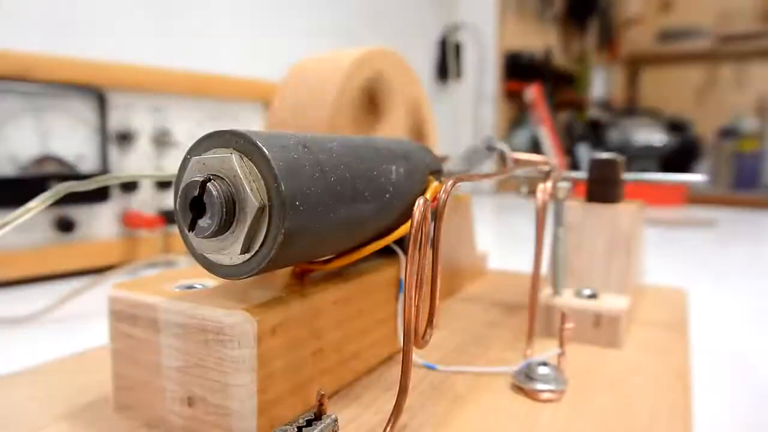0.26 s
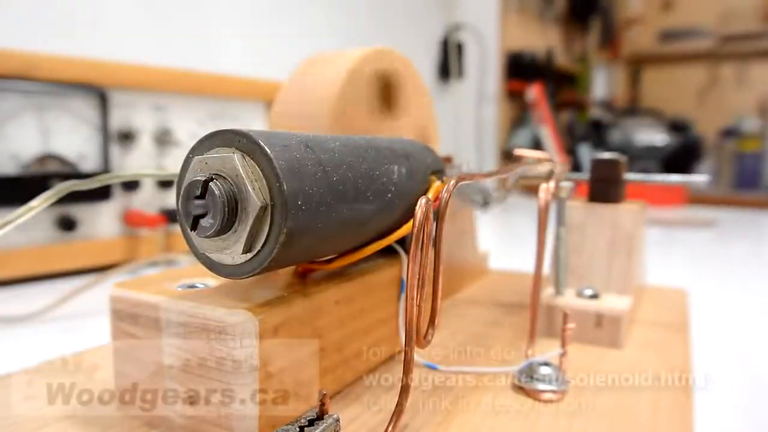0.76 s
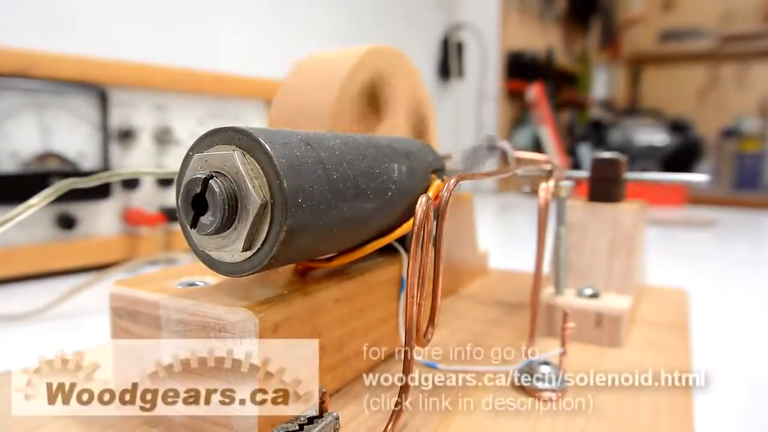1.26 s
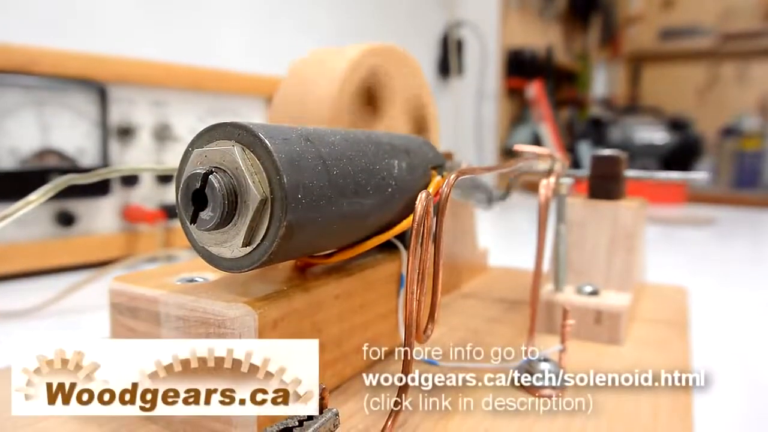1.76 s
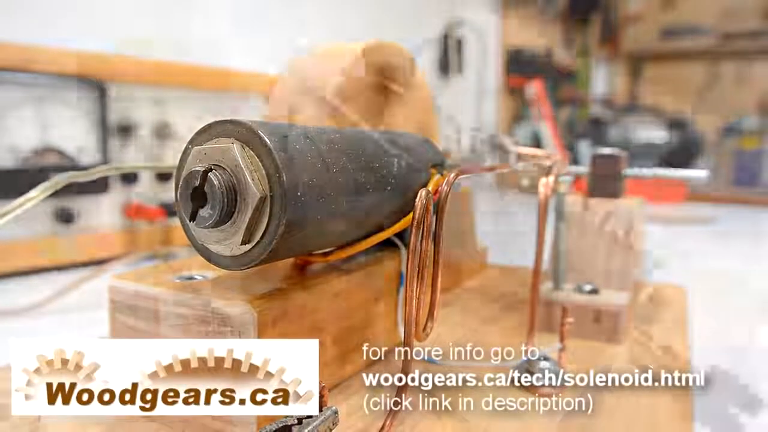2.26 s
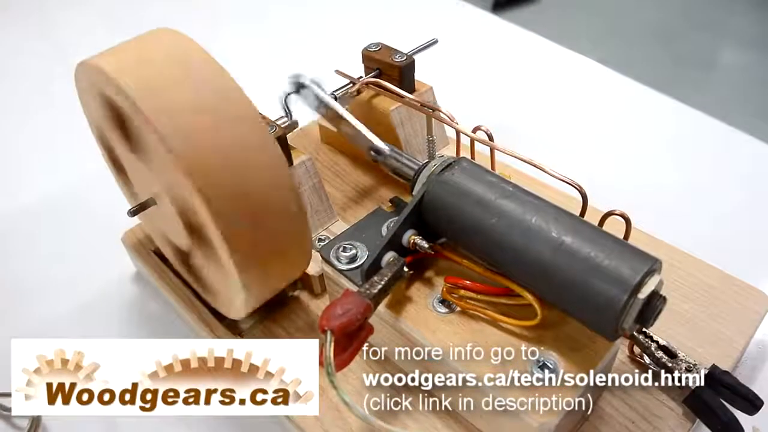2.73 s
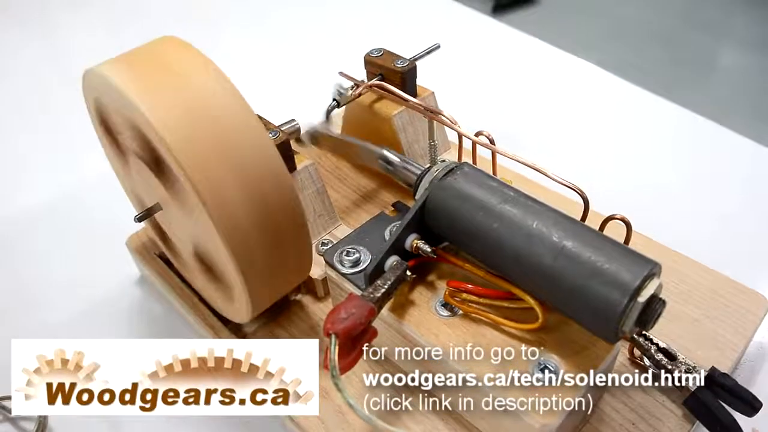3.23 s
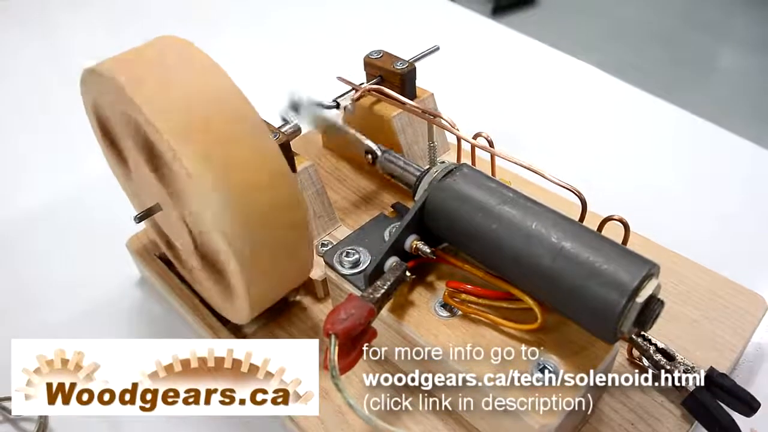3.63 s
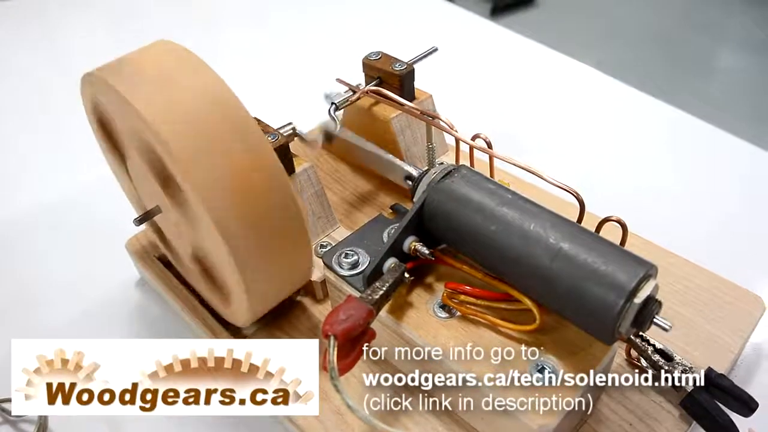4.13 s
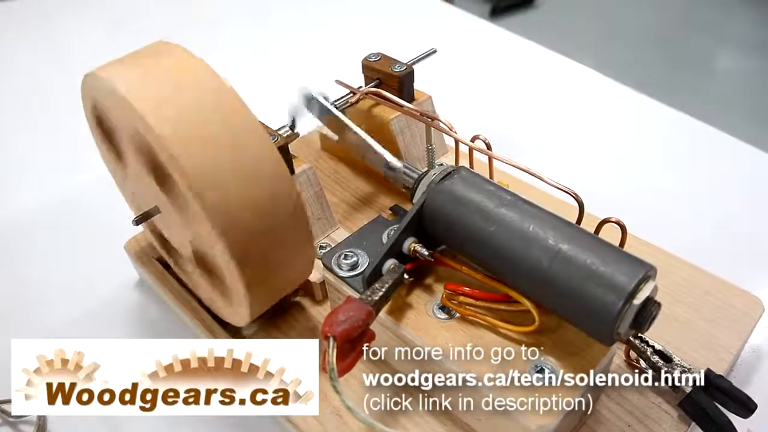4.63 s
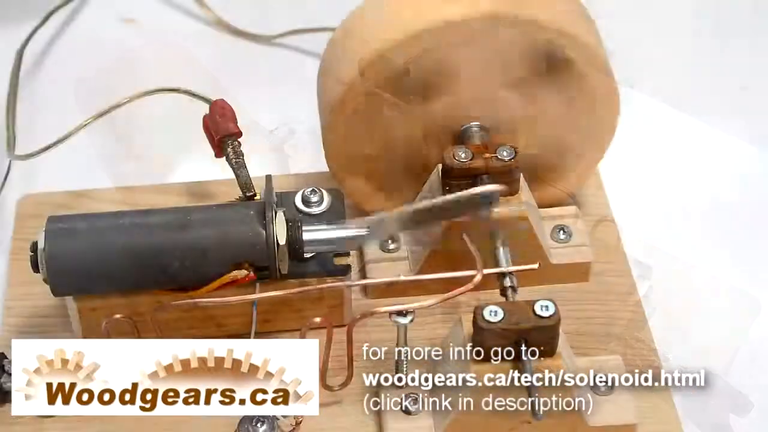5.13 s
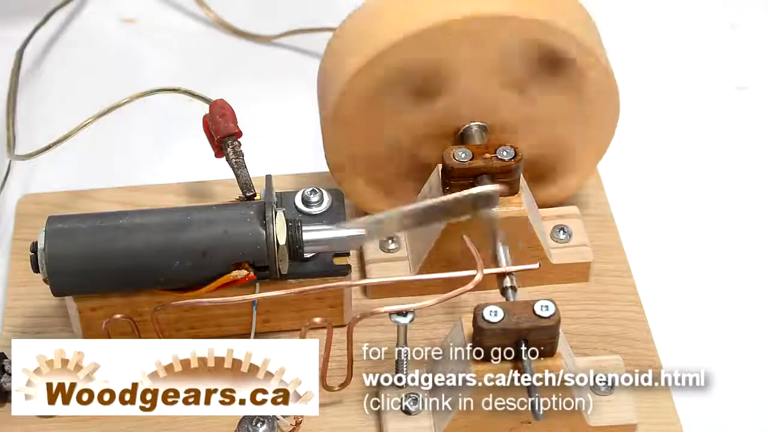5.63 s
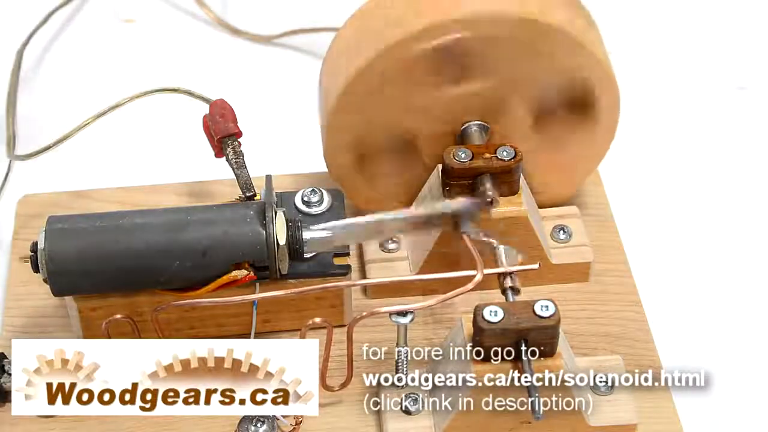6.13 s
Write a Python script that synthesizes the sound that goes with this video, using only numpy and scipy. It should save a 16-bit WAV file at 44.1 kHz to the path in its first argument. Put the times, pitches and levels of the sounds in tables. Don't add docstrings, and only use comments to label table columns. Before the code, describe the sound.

A small solenoid engine clatters fast and evenly on a wooden base, then a switch snaps very loudly and the flywheel coasts down.

```python
import sys
import numpy as np
from scipy import signal
from scipy.fft import rfft, irfft, next_fast_len
from scipy.io import wavfile
from scipy.ndimage import uniform_filter1d

SR = 44100
rng = np.random.default_rng(int(sys.argv[2]) if len(sys.argv) > 2 else 0)


def ratio_of_db(decibels):
    return 10 ** (np.asarray(decibels, float) / 20)


def store_wav(level_fs):
    pcm = np.round(np.clip(np.atleast_2d(level_fs), -1, 1) * 32767)
    wavfile.write(sys.argv[1], SR, pcm.T.astype(np.int16))


N = 281799

# start_s, blocks_knock_db
END_OUT = [(.2648, -38.5), (.4033, -36.5), (.5402, -37.5), (.6789, -38), (.8207, -39), (.9673, -39),
           (1.1154, -38.5), (1.254, -43), (1.4066, -37), (1.547, -39), (1.692, -38), (1.8335, -43.5),
           (1.975, -34.5), (2.1194, -35), (2.2563, -34.5), (2.3965, -35.5), (2.5325, -42)]
END_BACK = [(0.342, -42.5), (0.477, -39.5), (0.6152, -40), (0.759, -39.5), (0.904, -39), (1.05, -37.5),
            (1.1956, -40), (1.3416, -39), (1.485, -39), (1.63, -38), (1.773, -36.5), (1.9154, -39),
            (2.057, -40), (2.1989, -38), (2.339, -39), (2.475, -43.5)]
TOP_OUT = [(2.561, -41.5), (2.7057, -39.5), (2.8564, -39), (3.005, -37.5), (3.1537, -41), (3.2979, -39.5),
           (3.444, -37), (3.591, -42.5), (3.733, -39.5), (3.8745, -39.5), (4.0206, -37), (4.1644, -39.5),
           (4.3143, -38), (4.469, -36.5), (4.624, -38.5), (4.7761, -40.5), (4.9261, -38.5), (5.075, -40)]
TOP_BACK = [(0.0799, -39.5), (0.2277, -62), (2.4976, -45), (2.6576, -40), (2.8028, -43.5), (2.953, -42.5),
            (3.1009, -45), (3.245, -44), (3.392, -44), (3.534, -44.5), (3.6759, -44), (3.825, -43.5),
            (3.9679, -40), (4.111, -41.5), (4.2591, -41), (4.4159, -46), (4.565, -44.5), (4.7213, -43),
            (4.872, -43.5), (5.0241, -41.5), (5.1695, -46.5)]
SIDE_OUT = [(0.137, -35.5), (4.99, -41.5), (5.1397, -41), (5.2963, -40), (5.4587, -41), (5.6313, -40),
            (5.801, -49), (5.976, -44.5), (6.177, -47), (6.369, -44.5)]
SIDE_BACK = [(5.2253, -43.5), (5.4037, -38.5), (5.557, -44), (5.7383, -40.5)]
STROKES = [END_OUT, END_BACK, TOP_OUT, TOP_BACK, SIDE_OUT, SIDE_BACK]
# lag_ms, board_over_blocks_db
KNOCK = [
    (-1.5, -7),
    (-1.96, -4.5),
    (2.16, -5.5),
    (-6, -2),
    (0.87, -12),
    (-0.5, -6.5),
]
WIRE_LAGS = [
    (17, 28.5),
    (-7,),
    (31,),
    (-16.5,),
    (-17.5, 34),
    (-7, -22),
]
# time_s, stretch_factor
COAST = [(6.0, 6.17), (1.1, 2.35)]
# time_s, rumble_db, bearing_db, scrape_db
RUNNING = [
    (.03, -52.5, -57.5, -52.5),
    (.04, -70, -62, -61.5),
    (.3, -53.5, -61, -64),
    (2.3, -52.5, -60.5, -62),
    (2.6, -53.5, -62, -58.5),
    (4.9, -53.5, -61, -59),
    (5.3, -60.5, -65, -60.5),
    (5.8, -61.5, -63, -63),
    (6.05, -59, -65, -60),
    (6.39, -60.5, -70, -66),
]
# pitch_hz, level_db_per_hz
HUM = [(50, -7.5), (85, -30), (177, 6.5), (311, -4), (740, -6.5), (1900, -10.5), (3000, -31.5), (5500, -19),
       (9600, -45)]
# pitch_hz, level_db_per_hz
RUB = [(300, -7.5), (1900, -6), (2950, 1.5), (4900, -4), (6000, -9), (8200, -8.5), (9600, -21)]
# start_s, peak_db, ring_hz, left_over_right_db
END_TAPS = [(0.0185, -47, 3100, 16), (0.0652, -41, 2780, 2.0), (0.0834, -33.5, 2950, 11),
            (0.1383, -23, 3960, 4), (0.2255, -38.5, 3250, 15), (0.2281, -41, 2960, 2),
            (0.2318, -43, 3110, 9), (0.2348, -45, 2870, 0), (0.2673, -36, 2850, 5), (0.2729, -47, 3000, 1),
            (0.3985, -40, 2950, 13), (0.4046, -26, 2925, 2), (0.4107, -36, 3070, 14),
            (0.4399, -40, 2960, 4), (0.4792, -29, 3050, -9), (0.4816, -31, 3000, -3),
            (0.487, -45, 2980, 14), (0.4945, -46, 2680, 0.0), (0.5406, -29.5, 3280, -7),
            (0.5472, -41, 2980, 22), (0.5764, -40.5, 2980, -11), (0.5817, -43, 2870, 15),
            (0.6178, -30, 3400, -7), (0.6812, -25, 3100, 8.5), (0.6864, -35, 3100, -9),
            (0.7595, -37, 3090, -9), (0.7628, -37, 3470, -10), (0.8219, -30, 2940, 6),
            (0.827, -47, 3060, 2), (0.9051, -36.5, 2940, -11), (0.9087, -35, 2940, 1),
            (0.9695, -29.5, 3090, 6), (0.9746, -40, 3260, 3), (1.0508, -37, 2920, 11),
            (1.0534, -34.5, 3130, -14.5), (1.1154, -30.5, 3430, -6.0), (1.1223, -43, 3090, 15),
            (1.1959, -34.5, 2980, -11), (1.2037, -47, 3130, 9), (1.2562, -45, 2760, 16),
            (1.3423, -30.5, 2900, -6), (1.3501, -37.5, 2980, 8)]
END_TAPS_LATE = [(1.4015, -40, 2930, 7.0), (1.4078, -28, 2890, 8), (1.414, -36, 3040, -7),
                 (1.4358, -40, 2970, -2.0), (1.4877, -31.5, 2880, -12), (1.491, -34.5, 2800, 10),
                 (1.548, -35, 3080, -13), (1.5532, -36.0, 2880, 13), (1.6306, -33.5, 3070, -17),
                 (1.6333, -33.5, 2800, 11), (1.6383, -34, 2770, -10), (1.6934, -31.5, 2940, 4.0),
                 (1.6995, -37, 2850, 9), (1.774, -32, 2990, -13), (1.7795, -38.5, 2730, 14),
                 (1.8322, -40, 3070, -4), (1.8352, -41, 3200, 4), (1.917, -26.5, 2860, -8),
                 (1.92, -35, 3230, 7), (1.9768, -31, 2880, 16), (1.9825, -33, 2920, -4),
                 (1.9862, -38, 2880, 5), (2.0107, -35, 3070, -5.0), (2.0579, -27.5, 3130, -9),
                 (2.1205, -30, 2960, 9), (2.1259, -42.0, 2990, 7.0), (2.1986, -35.5, 3020, -19),
                 (2.201, -35, 2840, 11), (2.2523, -36, 3300, -9), (2.2586, -30.5, 2950, 12),
                 (2.265, -31, 2910, 2), (2.3379, -30.5, 2950, -10), (2.343, -37, 2880, -5.0),
                 (2.3468, -32, 3460, 2), (2.351, -36, 3350, -4), (2.3564, -43.0, 3630, 2),
                 (2.389, -35, 2980, -1.0), (2.398, -33, 3050, 22), (2.4045, -33.5, 3370, -10),
                 (2.4766, -37, 2980, -15), (2.479, -36, 2950, -2)]
TOP_TAPS = [(2.4976, -36, 2870, -6), (2.5025, -27, 2980, 1.0), (2.536, -37, 2910, 14),
            (2.563, -29, 3170, -1), (2.645, -36.5, 3170, 0), (2.652, -31, 3830, -8),
            (2.659, -35.5, 3870, -3.0), (2.7009, -38, 2890, 4), (2.7086, -29, 4820, -11),
            (2.7137, -48, 3090, -5.0), (2.716, -42, 2970, 2), (2.7952, -35, 3360, -3.0),
            (2.799, -39, 3650, -7), (2.8007, -34, 3330, 3.0), (2.804, -28.5, 3220, 2),
            (2.8507, -30, 3360, -4), (2.8587, -26, 3380, -5), (2.939, -40.0, 2650, 0.0),
            (2.945, -38, 3250, -1.0), (2.949, -26.5, 3440, -6), (2.949, -38, 3370, 5),
            (2.953, -26.5, 3100, -2), (2.9567, -41.0, 3100, 5.0), (2.998, -37.0, 3200, 7),
            (3.007, -25.5, 3200, -6), (3.0944, -32, 3550, -12), (3.1012, -25, 2770, -3),
            (3.1042, -32, 3460, -1.0), (3.1465, -33.5, 3170, 3), (3.154, -31, 4520, -9),
            (3.1607, -38, 3080, -1.0), (3.188, -39.0, 3180, 2.0), (3.2378, -37, 3760, -4.0),
            (3.247, -24, 2730, -5), (3.2927, -32, 3270, 4), (3.3012, -25, 3630, -6), (3.382, -35, 3100, -3),
            (3.3865, -35, 3400, -6), (3.393, -24, 2640, -3), (3.3971, -28, 3505, 4),
            (3.4376, -30.5, 3200, 1), (3.4453, -27.5, 3480, -6), (3.448, -41, 2970, -7),
            (3.4526, -44, 2800, 3.0)]
TOP_TAPS_LATE = [(3.5277, -33, 3700, -7), (3.533, -39.5, 3320, -2.0), (3.582, -29, 3210, 6),
                 (3.5912, -28.5, 4270, -10), (3.595, -43, 2960, -2), (3.597, -41.0, 3180, 0.0),
                 (3.673, -32, 3050, -3.0), (3.6843, -35, 3430, -4), (3.687, -37, 3310, 6.0),
                 (3.7271, -32, 3130, 0), (3.7349, -32, 4800, -12), (3.816, -34.5, 3300, -8),
                 (3.8186, -41, 2970, 7), (3.8696, -36, 2970, -2.0), (3.88, -30, 4840, -9),
                 (3.8818, -47, 2890, -4.0), (3.9595, -32, 3480, -6), (3.9638, -33, 3140, 5),
                 (3.969, -25.5, 2870, -6), (4.0136, -33.5, 3050, 4.0), (4.0231, -30.5, 3750, -7),
                 (4.0277, -46, 3030, -3.0), (4.103, -29, 3630, -2.0), (4.105, -38, 3870, -12),
                 (4.1103, -30.5, 3500, -8), (4.114, -29, 3370, -1), (4.1173, -32.0, 3480, 10),
                 (4.1576, -33, 3100, -3), (4.1652, -34, 3140, -3), (4.2504, -41, 3630, -2.0),
                 (4.2534, -37, 3380, -3.0), (4.261, -34, 3200, -8), (4.268, -50, 3230, 5),
                 (4.309, -30.5, 3380, 1), (4.3158, -27.5, 3950, -7), (4.322, -47, 2750, 1),
                 (4.404, -31, 3570, -3.0), (4.415, -29, 3520, 2.0), (4.419, -30, 3430, -3),
                 (4.4615, -43, 3200, -2), (4.4695, -21, 3300, -3.5), (4.559, -31, 3550, 1),
                 (4.57, -28.5, 2696, -8)]
SIDE_TAPS = [(4.626, -28.5, 3700, -10), (4.629, -32, 3040, 7), (4.712, -32, 3620, -5),
             (4.715, -34, 3570, -1), (4.723, -22, 2875, -6), (4.726, -46, 3320, -7), (4.772, -44, 3030, 5),
             (4.778, -25.5, 3010, 0), (4.783, -39.0, 2940, 0), (4.8412, -35, 3560, 0),
             (4.8625, -35.0, 3600, -1), (4.868, -47, 3500, -5.0), (4.873, -26.5, 2750, -7),
             (4.9192, -35, 3300, -3), (4.9264, -31, 3590, 0), (4.9278, -31, 2780, -2),
             (4.9326, -39, 3030, 7), (4.9927, -27.5, 3450, -1.0), (5.0124, -41, 3680, -2.0),
             (5.016, -37, 3330, -3.0), (5.019, -44, 3470, 1), (5.0243, -29, 3570, -6),
             (5.027, -40, 3110, 10), (5.0685, -36, 2950, 4), (5.0768, -29.5, 3430, -5),
             (5.135, -36, 3520, 0.0), (5.1418, -25, 3660, -1.0), (5.1615, -46, 3670, -3.0),
             (5.1639, -44, 3120, -7), (5.167, -41, 4020, -5.0), (5.1709, -30, 3750, -6),
             (5.175, -37, 3260, 8), (5.2242, -38.5, 4560, -7), (5.2918, -39.5, 3530, 0.0),
             (5.298, -27, 3660, -1), (5.4022, -32.5, 4460, 0), (5.406, -36, 3870, 1.0),
             (5.4522, -33.5, 3630, -6), (5.4598, -24.5, 3570, -1), (5.6306, -21.5, 3570, -1),
             (5.73, -42.0, 2650, 12), (5.7372, -39, 4750, -7), (5.741, -32, 4350, -3),
             (5.801, -33.5, 3600, -1.0)]
COASTING_TAPS = [(5.9766, -28.5, 3610, -4), (6.0193, -43, 4100, -3.0), (6.072, -44.0, 3020, 1.0),
                 (6.177, -37.5, 3700, -1.0), (6.369, -36, 3330, -1)]
TAPS = END_TAPS + END_TAPS_LATE + TOP_TAPS + TOP_TAPS_LATE + SIDE_TAPS + COASTING_TAPS
# ring_hz, decay_ms
CHATTER = [(2750, 0.84), (3300, 0.4), (4400, 0.28)]
# pitch_hz, level_db, t60_s
STEEL = [(2586, -2.5, 0.0057), (2940, -11.5, 0.026), (3570, -9, 0.014), (4390, -18, 0.0048),
         (5598, -11.5, 0.0083)]
# pitch_hz, level_db, t60_s
CRANK_PIN = (4950, 1, 0.0055)
# pitch_hz, level_db, t60_s
BOARD = [(173.3, 4, 0.11), (270, -17, 0.069), (322.3, 4, 0.062)]
# pitch_hz, level_db, t60_s
BLOCKS = [(760, 2.5, 0.1), (958, 6, 0.049), (1255, 6.5, 0.058), (1623, 7.5, 0.048)]
# time_s, level_db
SQUEAL = [
    (3.7, -52),
    (4.1, -29.5),
    (4.6, -40),
]
# lag_ms, level_db
SNAP_BLOWS = [
    (0, 4),
    (0.8, 0.5),
    (1.3, -4.5),
    (2.0, -3.5),
    (3.2, 3),
    (4.6, -6.5),
    (12, -26),
    (18.6, -16),
]
# pitch_hz, level_db, t60_s
LEVER = [(1230, -14.5, 0.015), (1714, -16.5, 0.034), (1963, -20, 0.015), (2980, -5.5, 0.02),
         (3870, -5.5, 0.0044), (4800, -2.5, 0.0053), (6300, 1, 0.0028), (8570, 1, 0.0017)]
# pitch_hz, level_db, t60_s
SPRING = [(10850, -37, 0.18), (12200, -21, 0.037), (15300, -36, 0.016)]
# pitch_hz, level_db, t60_s
CASE = [(980, -11.5, 0.11), (1028, -23.5, 0.45), (1190, -13.5, 0.15), (1430, -16.5, 0.26),
        (1430, -24, 0.37), (1930, -24, .45), (2040, -1, 0.047), (3010, -5.5, 0.077)]
# pitch_hz, level_db, t60_s
BOOM = [(115.3, -46, 0.14), (317.4, -27.5, 0.14), (330.7, -35, 0.29), (671, -24.5, 0.054)]
# pitch_hz, t60_s
SHOP = [(300, 0.19), (900, 0.46), (1700, 0.33), (3500, 0.32), (10000, 0.2)]
# pitch_hz, likeness
SAME = [(60, 0.89), (200, 0.99), (700, 0.84), (9000, 0.098)]
# pitch_hz, lead_rad
PORT_LEAD = [(2150, 0), (3190, -.9), (3880, .5), (4570, -.7), (9000, -.9)]
SNAP_S, SNAP_DB = 5.8281, -1.2


def evened(x):
    return x / np.sqrt(np.mean(x ** 2) + 1e-20)


def read(points, hz):
    f, value = np.transpose(points)
    return np.interp(np.log(hz + 1), np.log(f + 1), value)


def add(mix, s, sound):
    part = mix[:, round(s * SR):][:, :sound.shape[-1]]
    part += sound[..., :part.shape[1]]


def band(x, lo_hz, hi_hz):
    return signal.sosfilt(signal.butter(3, [lo_hz, hi_hz], "band", fs=SR, output="sos"), x)


def ring(modes, spread_db, size=4000, detune=.021, alternate=False):
    hz, db, t60 = np.transpose(modes)[:, :, None]
    luck = rng.standard_normal((2, len(modes), 1))
    t = np.arange(size) / SR
    if alternate:
        side = np.cos(np.pi * np.arange(len(modes)))[:, None]
    else:
        side = np.sign(luck[1])
    decay = ratio_of_db(db + spread_db * luck[0] - 60 * t / t60)
    return (decay * side * np.sin(2 * np.pi * hz * (1 + detune * luck[1]) * t)).sum(0)


def hiss(spectrum, patchy_db, size=512):
    frames, hz = 4 * N // size + 5, np.fft.rfftfreq(size, 1 / SR)
    a, b, c, d, patches = rng.standard_normal((frames, len(hz), 5)).T
    patches = uniform_filter1d(patches, size=5, axis=0)
    patches = evened(uniform_filter1d(patches, size=4, axis=1))
    same = np.clip(read(SAME, hz), 0, 1)[:, None]
    left = a + 1j * b
    right = same * left + np.sqrt(1 - same ** 2) * (c + 1j * d)
    z = np.array([left, right]) * ratio_of_db(read(spectrum, hz)[:, None] + patchy_db * patches)
    return signal.istft(z, nperseg=size, noverlap=3 * size // 4)[1][:, :N]


def knocks():
    return [(s + lag_ms / 1000, blocks_db, over_db)
            for table, (lag_ms, over_db) in zip(STROKES, KNOCK) for s, blocks_db in table]


def running():
    s, low_db, mid_db, high_db = np.transpose(RUNNING)
    t = np.arange(N) / SR
    hum = hiss(HUM, patchy_db=2.5, size=1024)
    low = signal.sosfilt(signal.butter(2, 550, fs=SR, output="sos"), hum)
    air = evened(band(low, 269.6, 313)) * ratio_of_db(-61.5)
    rumble = evened(low) * ratio_of_db(np.interp(t, s, low_db))
    bearings = evened(hum - low) * ratio_of_db(np.interp(t, s, mid_db) + 7.0)

    knock_s, knock_db, _ = np.transpose(knocks())
    strokes = np.zeros(N)
    strokes[((knock_s + .002) * SR).astype(int)] = ratio_of_db(knock_db + 47.5)
    u = np.arange(-1500, 1501) / SR
    rise_and_fall = np.where(u < 0, np.exp(u / 0.0096) * .5, np.exp(-u / 0.0078))
    swell = signal.fftconvolve(strokes, rise_and_fall, "same")
    catches = (rng.random(N) < 520 / SR) * ratio_of_db(-7 + 1.1 * np.minimum(rng.exponential(1, N), 3))
    grit = .5 + signal.fftconvolve(catches, np.exp(-np.arange(300) / 107.0))[:N]
    rub = evened(hiss(RUB, patchy_db=-1.0, size=256))
    scrape = ratio_of_db(np.interp(t, s, high_db) + 12) * rub * (0.22 + 0.48 * swell) * grit
    return air + rumble + bearings + scrape


def ticks():
    out, t = np.zeros((2, N)), np.arange(400) / SR
    times, levels_db, rings_hz, pans_db = np.transpose(TAPS)
    pin_s = np.array(TOP_OUT + SIDE_OUT[:1])[:, 0]
    on_pin = abs(times[:, None] - pin_s).min(1) < .003
    raw = []
    for hz, pin in zip(rings_hz, on_pin):
        u = t / (read(CHATTER, hz) / 1000 * (.45 if pin else 1))
        chatter = rng.standard_normal((2, len(t))) * (u + 0.28) * np.exp(-u) * 0.46
        chatter[0, 4] += 2.2
        chatter[1] = chatter[0] + 0.098 * chatter[1]
        modes = [(hz, 4, .0065)] + STEEL + [CRANK_PIN] * int(pin)
        linkage = ring(modes, spread_db=1.7, size=700, detune=.011)
        raw.append(signal.fftconvolve(chatter, linkage[None], axes=1))
    heard = band(np.array(raw), 2330, 7300)
    power = uniform_filter1d(2 * band(heard.mean(1), 1900, 6000) ** 2, size=24)
    for s, db, pan_db, tick, shape in zip(times, levels_db, pans_db, heard, power):
        start_s = max(s - shape.argmax() / SR, 0)
        pan = ratio_of_db([[pan_db / 2], [-pan_db / 2]])
        add(out, start_s, ratio_of_db(db) / np.sqrt(shape.max()) * tick * pan)
    return out


def contacts():
    out, t = np.zeros((2, N)), np.arange(400) / SR
    starts_s = [row[0] + lag / 1000 * np.interp(row[0], *COAST)
                for table, lags in zip(STROKES, WIRE_LAGS) for row in table for lag in lags]
    for s in starts_s:
        envelope = np.exp(-t / 0.013) * np.minimum(t / 0.00037, 1)
        zips = rng.standard_normal((2, len(t))) * envelope * ratio_of_db(0.92 * rng.standard_normal())
        zips[1] = zips[0] + 1.3 * zips[1]
        wire_hz = np.interp(s, [2.4, 2.6, 5.1, 5.3], [5710, 6370, 6500, 8240])
        wire = ring([(wire_hz, 0, .005), (6500, -6, .005)], spread_db=9.0, size=400)
        level_db = np.interp(s, [2.4, 5.0, 5.4, 5.8, 6.1], [-64.5, -62.5, -65.0, -63.5, -68.0])
        add(out, s, signal.fftconvolve(zips, evened(wire)[None], axes=1) / 9 * ratio_of_db(level_db))
    return out


def thumps():
    out = np.zeros((2, N))
    for s, blocks_db, over_db in knocks():
        shove = rng.standard_normal(400) * np.exp(-np.arange(400) / 60.)
        board_db = blocks_db + over_db
        for modes, db in ((BOARD, board_db + 5.5), (BLOCKS, blocks_db + 0.5)):
            knock = signal.fftconvolve(ring(modes, spread_db=1.5, detune=0.04), shove)
            add(out, s, ratio_of_db(db) * knock[None] / abs(knock).max())
    add(out, 2.65, ratio_of_db(-37.5) * ring(BOARD[1:], spread_db=-7)[None])
    return band(out, 155, 1700) * ratio_of_db([[.4], [-.4]])


def squeal():
    out, t = np.zeros((2, N)), np.arange(2000) / SR
    for s, _ in TOP_BACK[3:]:
        song = evened(band(rng.standard_normal(len(t)), 2700, 3780))
        drag = song * np.minimum(t / 0.0043, 1) * np.exp(-t / 0.0085)
        add(out, s - .005, ratio_of_db(np.interp(s, *np.transpose(SQUEAL))) * drag[None])
    return out


def snap():
    out, crack = np.zeros((2, N)), np.zeros((1, 2000))
    lever = ring(LEVER, spread_db=1.5, size=1500, detune=0, alternate=True)[None]
    for ms, db in SNAP_BLOWS:
        add(crack, ms / 1000, ratio_of_db(db) * lever)
    crack = band(crack, 1300, 8000)
    crack /= abs(crack).max()
    add(out, SNAP_S - .0017, ratio_of_db(SNAP_DB - 13) * band(crack, 3500, 10000))
    add(out, SNAP_S, ratio_of_db(SNAP_DB) * crack)
    add(out, SNAP_S, ring(SPRING, spread_db=5, detune=0) * ratio_of_db([[-4], [3]]))
    add(out, SNAP_S + .001, ratio_of_db(-14) * ring(CASE, spread_db=1, size=16000, detune=0)[None])
    swelling = np.minimum(np.arange(4000) / 200, 1)
    add(out, SNAP_S + 0.0015, ring(BOOM, spread_db=0, detune=0)[None] * swelling)
    return out


def shop(x):
    taps = np.zeros((2, SR // 2))
    at = np.arange(200, SR // 2 - 8, 8)
    at = at + rng.integers(0, 8, (2, len(at)))
    np.put_along_axis(taps, at, rng.choice([-1., 1.], at.shape), 1)
    taps[1] = 0.45 * taps[0] + 0.73 * taps[1]
    hz, t, z = signal.stft(taps, SR, nperseg=256)
    decay = ratio_of_db(-60 * t / read(SHOP, hz)[:, None])
    tail = signal.istft(z * decay, SR, nperseg=256)[1]
    return signal.fftconvolve(x, tail / np.linalg.norm(tail[0]), axes=1)[:, :N]


def scene():
    engine = ticks() + contacts() + thumps() + squeal()
    blast = np.zeros((2, N))
    lower_treble = signal.butter(1, [850, 3700], "band", fs=SR)
    add(blast, SNAP_S + 0.0024, signal.lfilter(*lower_treble, np.r_[1., np.zeros(400)]))
    echoes = shop(ratio_of_db(-13.0) * engine + ratio_of_db(12.5) * blast)
    return running() + engine + snap() + echoes


def low_pass(x):
    return signal.sosfilt(signal.butter(12, 15800, fs=SR, output="sos"), x)


def record(dry):
    size = next_fast_len(N)
    hz = np.fft.rfftfreq(size, 1 / SR)
    response_db = np.interp(hz, [20, 45, 9600, 9850, 10350, 10500, 11000, 11200, 13200, 15400],
                            [-18.0, -0.5, -0.5, -36, -29.0, -4.5, -1.5, -6, -28, -12.5])
    lead = np.exp(.5j * np.outer([1, -1], read(PORT_LEAD, hz)))
    ports = irfft(rfft(dry, size) * ratio_of_db(response_db) * lead, size)[:, :N]
    return low_pass(ports)


dry = scene()
out = record(dry)
store_wav(out)
```